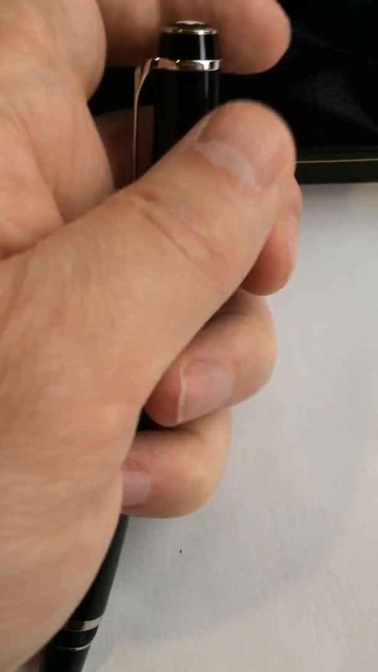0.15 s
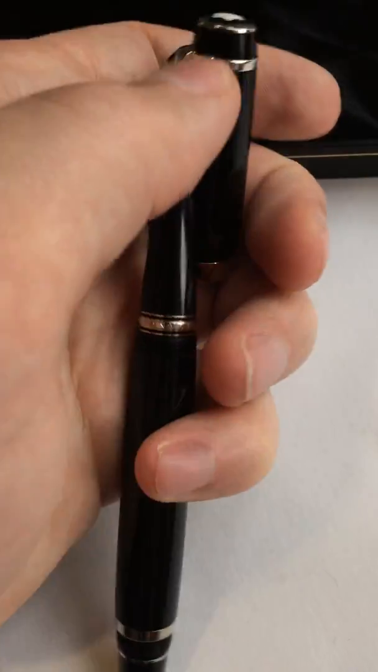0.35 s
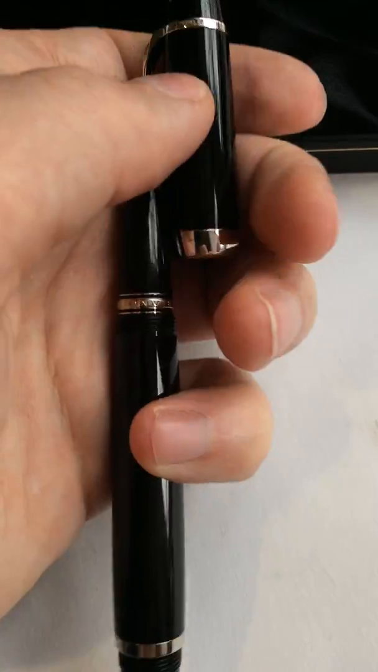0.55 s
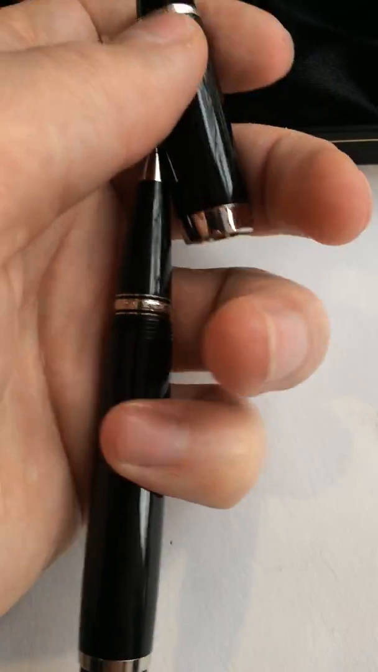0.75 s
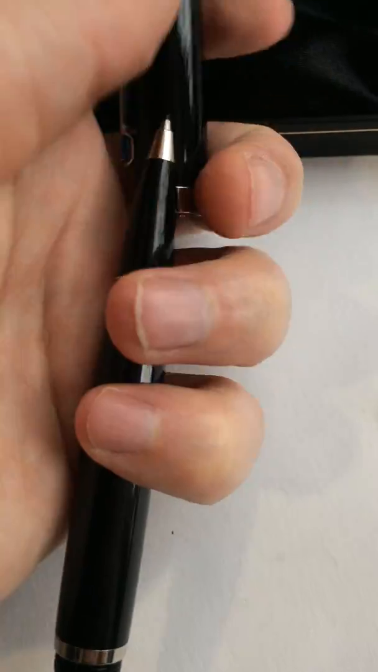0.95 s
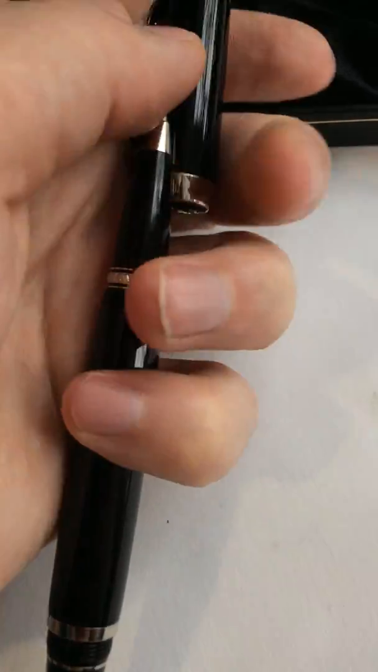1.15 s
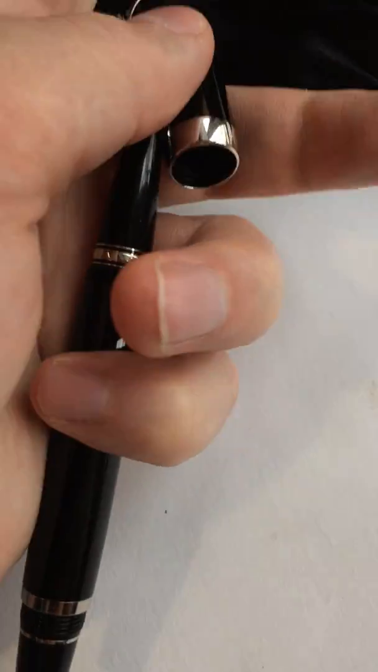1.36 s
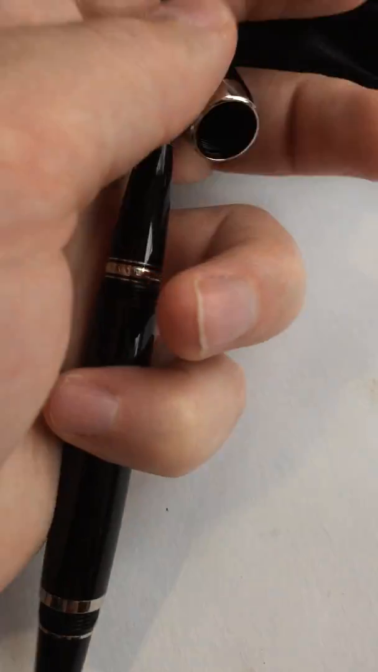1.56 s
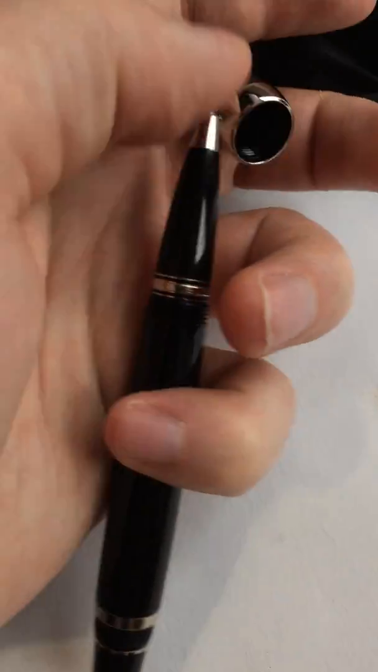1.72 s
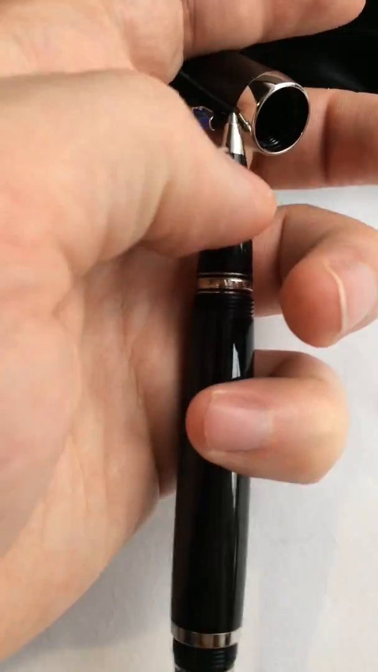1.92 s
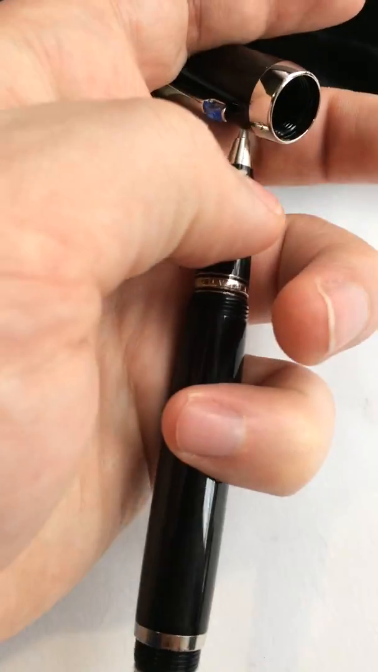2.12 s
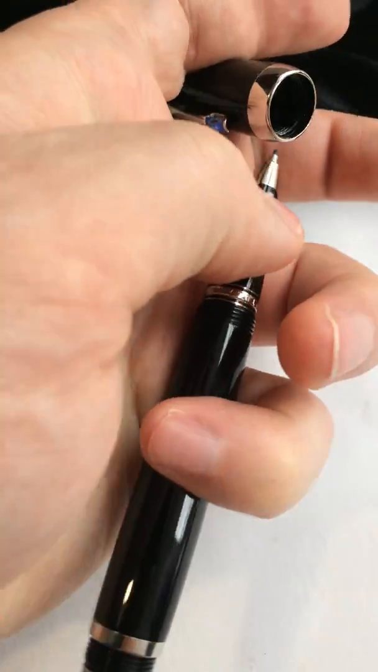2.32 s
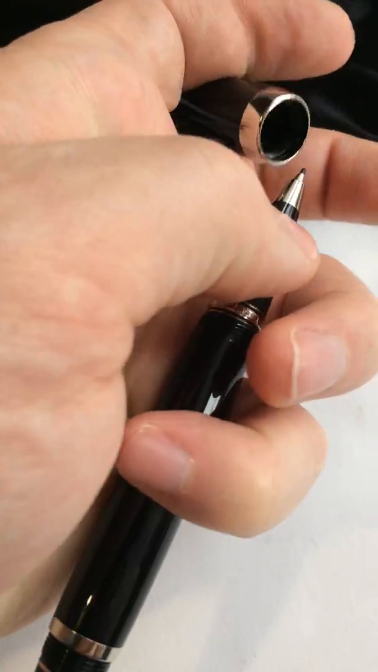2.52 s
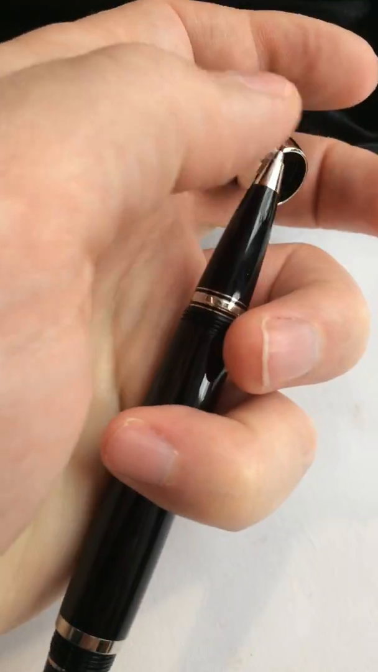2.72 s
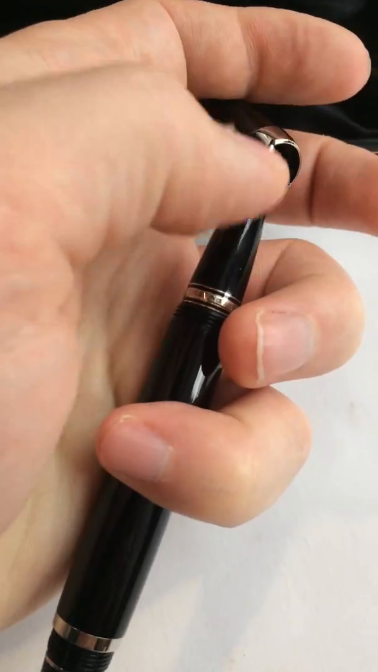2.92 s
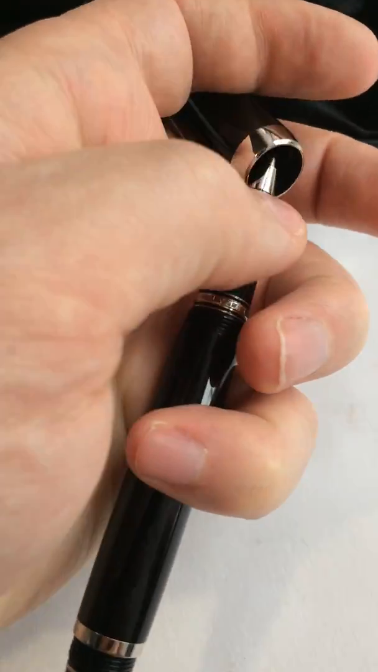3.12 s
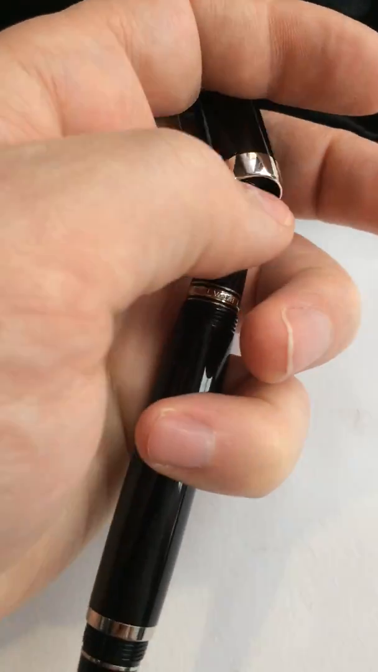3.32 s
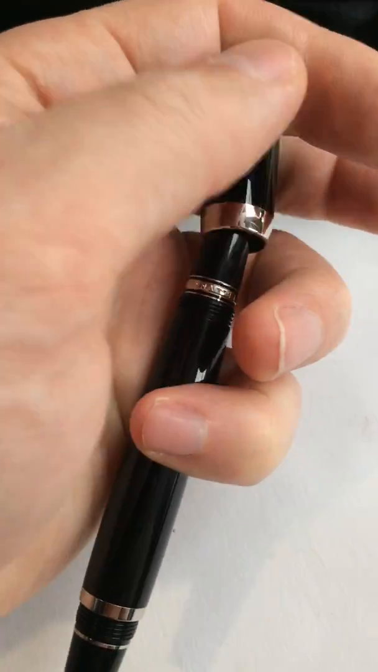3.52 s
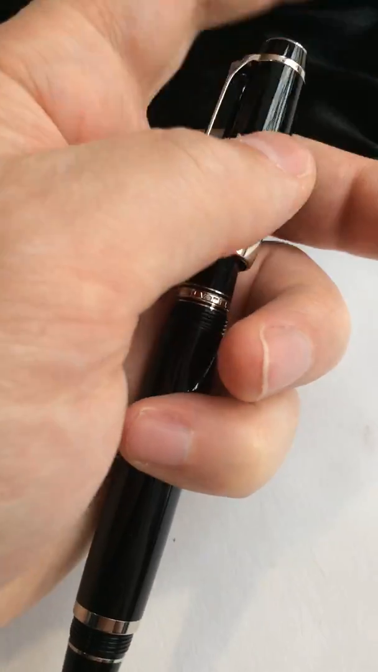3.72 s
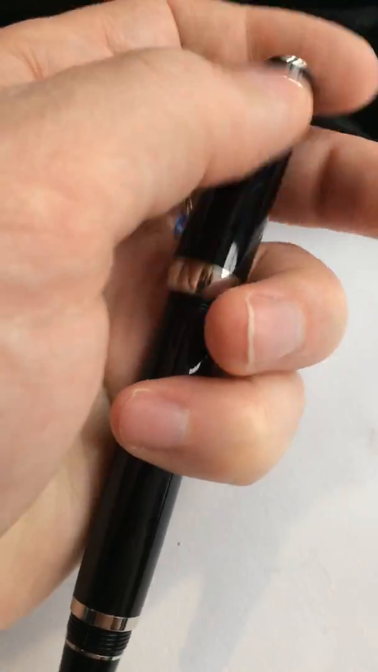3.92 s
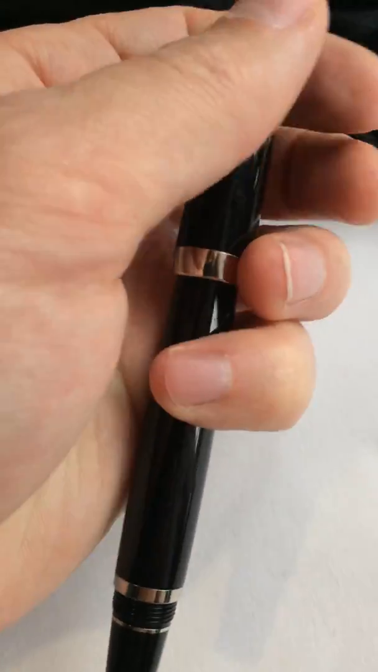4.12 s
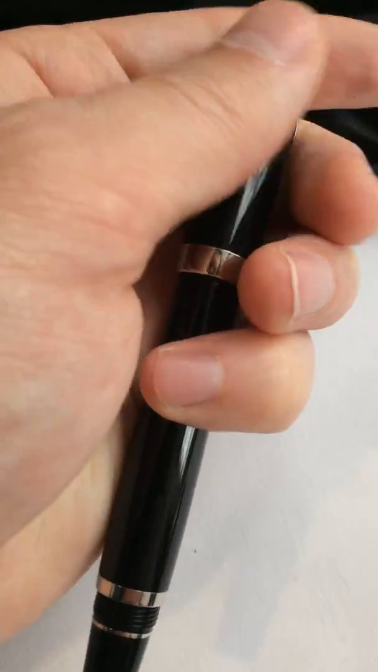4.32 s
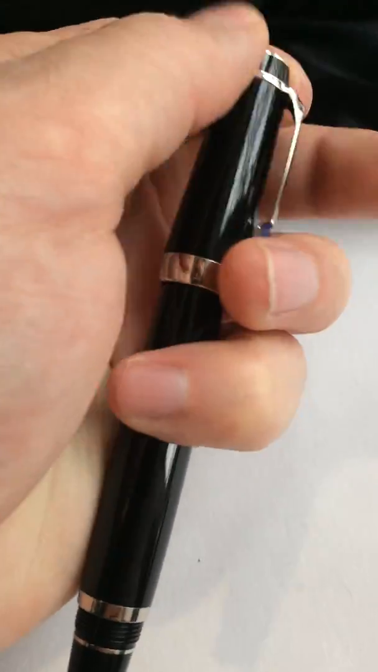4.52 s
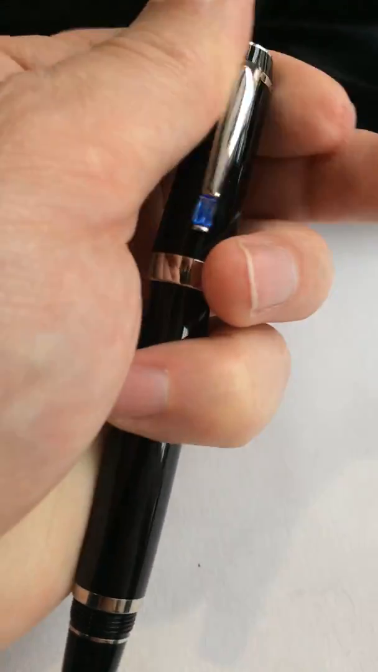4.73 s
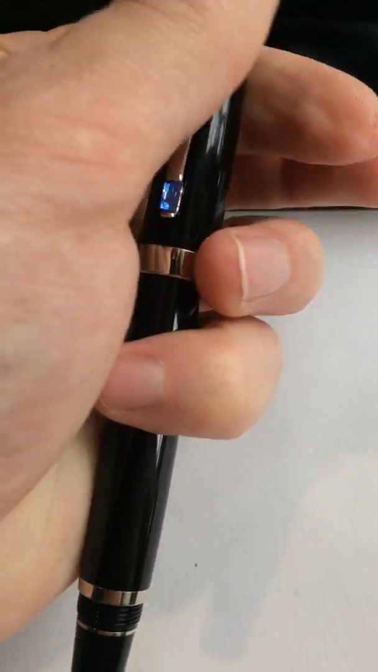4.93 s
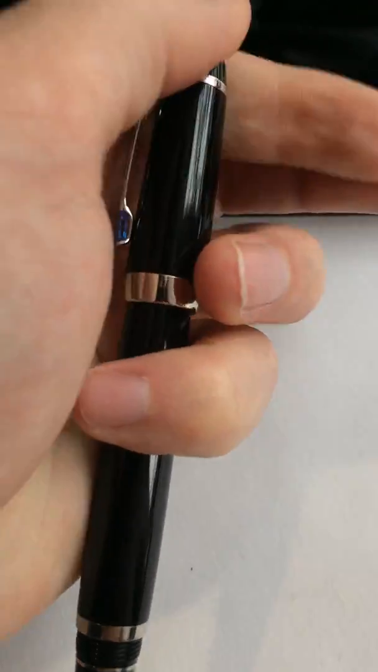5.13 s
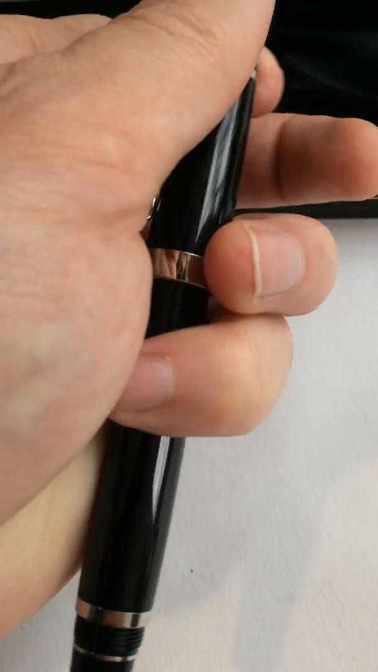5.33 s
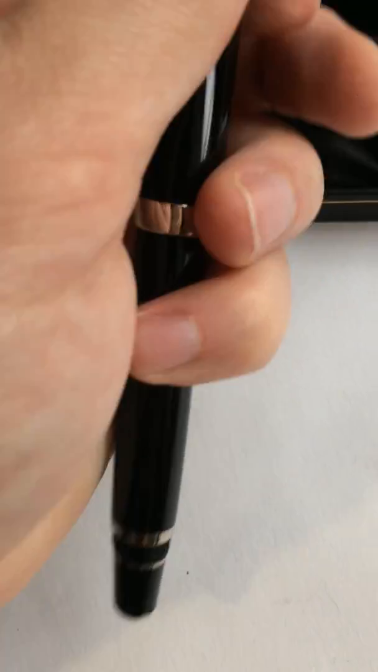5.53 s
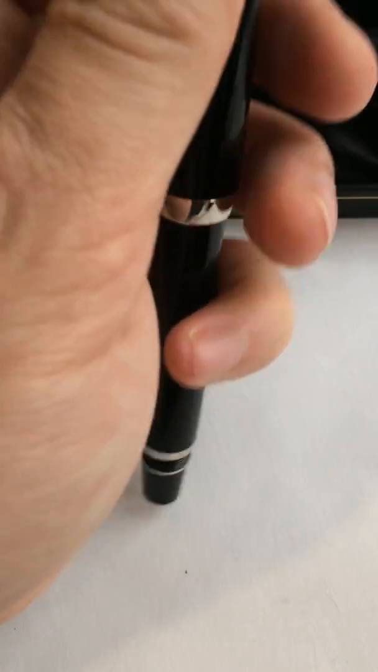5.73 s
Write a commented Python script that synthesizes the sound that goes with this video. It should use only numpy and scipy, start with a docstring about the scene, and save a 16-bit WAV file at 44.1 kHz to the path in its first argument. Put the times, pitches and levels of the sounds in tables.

```python
"""Capping a pen

Hands lift the cap off a resin and metal pen, tap it against barrel and tip, slide it on and twist it tight.
Each contact is an impulse and a dying chatter of micro-impacts that excite the resonances of the parts.
A hard contact is brighter, a light one chatters longer; the cap seats in a rattling burst of slips.
The clip snaps once, fingers brush the barrel as grainy friction noise, and a short diffuse room answers.
An appliance hums low as wavering tones, over a steady rumble and faint hiss of room air."""
import sys
import numpy as np
from scipy import signal
from scipy.fft import rfft, irfft
from scipy.io import wavfile
from scipy.ndimage import uniform_filter1d

SR = 44100
rng = np.random.default_rng(int(sys.argv[2]) if len(sys.argv) > 2 else 0)


def file_out(sig):
    """Save sig as 16-bit WAV at sys.argv[1]."""
    # one column per channel
    cols = np.atleast_2d(sig).T
    # limit, then scale
    lim = np.clip(cols, -1, 1)
    pcm = np.round(lim * 32767).astype(np.int16)
    wavfile.write(sys.argv[1], SR, pcm)


N = 258426


def from_db(db):
    """Level: decibels to amplitude gain."""
    return 10 ** (np.asarray(db) / 20)


def unit_energy(x):
    """Energy normalisation: the squares sum to one."""
    return x / np.sqrt(np.sum(x ** 2) + 1e-20)


def band(x, low_hz, high_hz, order=2):
    """Band limitation: a causal Butterworth band-pass."""
    edges_hz = [low_hz, min(high_hz, .45 * SR)]
    return signal.sosfilt(signal.butter(order, edges_hz, "band", fs=SR, output="sos"), x)


def add(out, s, sound):
    """Superposition: mix a sound in at a time in seconds."""
    at = int(np.clip(round(s * SR), 0, N - 1))
    out[at:at + len(sound)] += sound[:N - at]


def drift(per_s):
    """Random modulation: normal values of unit spread, joined by straight lines, per_s of them a second."""
    knots = rng.standard_normal(400)
    return np.interp(np.arange(N) / SR * per_s, np.arange(len(knots)), knots)


# appliance hum, one row a tone: pitch_hz, rms_db, waver_db
HUM = [(98, -82, 3), (147.3, -63.3, 1.0), (254, -73, 1.5), (296, -83, 3), (441, -85, 3), (668, -88, 2),
       (801, -89, 2)]


def hum():
    """Tonal motor noise: sinusoids that waver a little in level and phase."""
    t = np.arange(N) / SR
    out = np.zeros(N)
    for hz, db, waver_db in HUM:
        amplitude = np.sqrt(2) * from_db(db + waver_db * drift(5.0))
        phase_waver = 0.2 * waver_db * drift(5.3)
        out += amplitude * np.sin(2 * np.pi * hz * t + phase_waver)
    return out


# spectral shape of the room air: frequency_hz, relative_density_db (per Hz)
AIR = [(25, -24), (45, -9), (95, -6), (135, -5.5), (185, -1), (235, -8), (285, -7.5), (340, -14.5),
       (450, -14), (950, -21.5), (2500, -25.5), (5000, -30.5), (12000, -33.5), (16000, -44)]


def air(rms_db=-66):
    """Stationary broadband noise: steady low rumble fading into faint hiss."""
    hz, db = np.transpose(AIR)
    bins_hz = np.maximum(np.fft.rfftfreq(N, 1 / SR), 1)
    shape = from_db(np.interp(np.log(bins_hz), np.log(hz), db))
    noise = irfft(rfft(rng.standard_normal(N)) * shape, N)
    return from_db(rms_db) * np.sqrt(N) * unit_energy(noise)


def room(direct, all_round, desk_db, desk_t60):
    """Reflection and reverberation: quick scatter from hands and desk, then a diffuse, duller tail."""
    tail_t60_s, tail_db, dull_hz = 0.17, -20, 6700
    t = np.arange(SR // 2) / SR
    near, far = rng.standard_normal((2, len(t))) * (t > .002)  # nothing returns within 2 ms
    scatter = from_db(desk_db) * unit_energy(near * from_db(-60 * t / desk_t60))
    tail = from_db(tail_db) * unit_energy(far * from_db(-60 * t / tail_t60_s))
    echoes = signal.fftconvolve(direct, scatter) + signal.fftconvolve(all_round, tail)
    return band(echoes[:N], 200, dull_hz, order=1)


# spans in which the fingers shift their hold: from_s, to_s
REGRIPS = [(4.299, 6), (5.003, 5.7)]


def brushes(count):
    """Random light friction: faint strokes scattered through each change of hold."""
    length_s, level_db, octaves = 0.033, -72, 0.98
    centre_hz, spread_octaves = 2880, 0.76
    out = []
    for start, end in REGRIPS:
        for k in range(count):
            s = start + (end - start) * (k + rng.random()) / count
            hz = centre_hz * 2 ** (spread_octaves * (2 * rng.random() - 1))
            out.append((s, length_s, level_db, hz, octaves))
    return out


# skin sliding on the pen: middle_s, length_s (at half height), rms_db (before the swell), centre_hz, width_octaves
RUBS = [(0.08, 0.16, -73.5, 2750, 0.59), (0.116, 0.046, -72, 8800, 0.45), (0.425, 0.049, -66.5, 2910, 0.6),
        (0.472, 0.045, -71, 2640, 0.499), (0.51, 0.058, -75, 10600, 0.17), (1.346, 0.042, -75, 7840, 0.34),
        (1.703, 0.07, -63.5, 1820, 0.77), (1.82, 0.056, -76, 12100, 0.43),
        (2.173, 0.037, -70.5, 2480, 0.94), (3.536, 0.054, -76.5, 2725, 0.93), (4.47, 0.058, -66, 4160, 1.6),
        (4.665, 0.045, -75, 8000, 0.2), (4.765, 0.04, -73.5, 11100, 0.084), (4.867, 0.02, -65, 5000, 1.8),
        (4.93, 0.08, -73, 7930, 2.2), (5.266, 0.05, -69, 8600, 0.42), (5.284, 0.044, -67.5, 2740, 0.97),
        (5.727, 0.021, -69, 3060, 0.9)]


def fingers(grain_db, clump_db, clumps_per_s):
    """Stick-slip friction: skin catches in tiny grains, bunched into uneven scratches under a swell."""
    out, t = np.zeros(N), np.arange(SR // 2) / SR
    for s, length, db, hz, octaves in RUBS + brushes(count=5):
        hiss, catch, grip = rng.standard_normal((3, len(t)))
        size = int(np.clip(2 * length * SR, 64, len(t)))
        clumps = np.interp(t * clumps_per_s, np.arange(len(grip)), grip)
        grains = hiss * from_db(grain_db * catch + clump_db * np.minimum(clumps, 1.5))
        friction = band(grains, hz * 2 ** (-octaves / 2), hz * 2 ** (octaves / 2), order=1)[:size]
        add(out, s - length, from_db(db) * np.sqrt(size) * unit_energy(friction) * np.hanning(size))
    return out


def resonate(x, hz, width_hz):
    """Damped resonance: a two-pole filter with gain near one at its top."""
    r = np.exp(-np.pi * width_hz / SR)
    zeros = np.array([1, 0, -1]) * (1 - r * r) / 2
    return signal.lfilter(zeros, [1, -2 * r * np.cos(2 * np.pi * hz / SR), r * r], x)


def recolour(sound, energies_db, edges):
    """Minimum-phase equalisation: steer the energy of each band of a short sound to its level, causally."""
    size = len(sound)
    spectrum, hz = rfft(sound), np.fft.rfftfreq(size, 1 / SR)
    which = np.searchsorted(edges[1:-1], hz)
    energy = np.bincount(which, np.abs(spectrum) ** 2) * 2 / size
    log_gain = np.log(from_db(energies_db) / np.sqrt(energy + 1e-20))[which]
    cepstrum = irfft(uniform_filter1d(log_gain, size=25), size)  # band steps smoothed
    folded = cepstrum * (1 + np.sign(np.fft.fftfreq(size)))
    return irfft(spectrum * np.exp(rfft(folded)), size)


# limits of the low, main, bright and top bands: edge_hz
BAND_EDGES = [1110, 2350, 6000, 9200, 13800]


def contacts(rows, body, chatter_db, crack_db, vary_db, detune=0.0053, edges=BAND_EDGES):
    """Modal excitation: snap and chatter ring the body, towards the microphone and all round into the room."""
    # heard from all sides at once, the resonances blur into one broad hump, fuller in the low band
    hump_hz, hump_width_hz, hump_low_db = 3235, 2600, 4.5
    out, t = np.zeros((2, N)), np.arange(SR // 20) / SR
    for s, level_db, low_db, bright_db, top_db, t60 in rows:
        grit = rng.standard_normal(len(t))
        force = grit * np.abs(grit) * from_db(chatter_db - 60 * t / max(t60, 1 / SR))
        force[0] = 1  # the snap
        sound = from_db(crack_db) * unit_energy(force)
        for (hz, width_hz, db), (strength, shift) in zip(body, rng.standard_normal((len(body), 2))):
            # the grip changes, so every mode shifts a little from touch to touch
            ring = unit_energy(resonate(force, hz * (1 + detune * shift), width_hz))
            sound = sound + from_db(db + vary_db * strength) * ring
        blurred = resonate(force, hump_hz, hump_width_hz)
        for path, wave, extra_low_db in zip(out, (sound, blurred), (0, hump_low_db)):
            # small parts radiate almost no bass
            wave = band(wave, edges[0], edges[-1], order=4)
            energies_db = level_db + np.array([low_db + extra_low_db, 0, bright_db, top_db])
            add(path, s, recolour(wave, energies_db, edges))
    return out


def touches(rows, low_db, bright_db, top_db, t60):
    """Contact stiffness: a harder touch is brighter and thinner, a lighter one skids for longer."""
    thinning = 0.4  # dB of low band lost per dB of hardness
    doubling_db = 15.5  # a touch this much lighter chatters twice as long
    out = []
    for s, db, hard_db in rows:
        chatter_s = t60 * 2 ** (-db / doubling_db)
        out.append((s, db, low_db - thinning * hard_db, bright_db + hard_db, top_db + hard_db, chatter_s))
    return out


def bouncing(rows, gap_s, loss_db, count):
    """Rebound: the n-th gap is 1/n of the first, and the level drops with each doubling of n."""
    out = []
    for s, db, hard_db in rows:
        for n in range(1, 2 + count):
            out.append((s, db - loss_db * np.log2(n), hard_db))
            s = s + gap_s / n
    return out


def hand_thud(rows, thud_db, t60):
    """Damped structural shock: a click jolts the barrel in the hand, a dull knock under it."""
    out, t = np.zeros(N), np.arange(SR // 10) / SR
    for s, level_db, *colour in rows:
        knock = band(rng.standard_normal(len(t)) * from_db(-60 * t / t60), 390, 1050)
        add(out, s, from_db(level_db + thud_db) * unit_energy(knock))
    return out


# ringing of the metal clip: pitch_hz, relative_level_db, t60_s
CLIP_MODES = [(3520, -39, .055), (3860, -44, .04), (4030, -53, .15), (7897, -61, .1), (9620, -62, .1),
              (10660, -57, .1)]


def clip_ring(rows, ring_db):
    """Lightly damped modes: the springy clip picks up each contact and rings faintly."""
    out, t = np.zeros(N), np.arange(SR // 4) / SR
    ring = sum(from_db(db - 60 * t / t60) * np.sin(2 * np.pi * hz * t) for hz, db, t60 in CLIP_MODES)
    for s, level_db, *colour in rows:
        add(out, s, from_db(level_db + ring_db) * ring)
    return out


# ticks as the thumb lifts the cap off: start_s, level_db, hardness_db
UNCAP_TICKS = [(0.0, -16, 1), (0.0595, -45, -2), (0.0905, -52, -6), (0.1515, -53, 15), (0.1853, -25.5, 1),
               (0.2194, -32, -3)]
# resonances of the half-lifted cap: pitch_hz, width_hz, energy_db
LIFTED_CAP = [(2040, 340, 8), (3030, 330, -0.5), (3880, 220, 4), (6300, 580, -1), (7750, 390, 8),
              (8900, 320, 2), (10400, 540, -18), (14300, 600, -8)]


def uncapping():
    """Release ticks: the lifted cap's modes are struck as it comes free."""
    ticks = touches(UNCAP_TICKS, low_db=-15, bright_db=-10.5, top_db=-15, t60=0.0035)
    return contacts(ticks, LIFTED_CAP, chatter_db=-23, crack_db=-15, vary_db=2)


CLIP_SNAP = [(5.1573, -5, -0.5)]
# resonances of the cap pinched between the fingers: pitch_hz, width_hz, energy_db
PINCHED_CAP = [(1240, 260, -14), (1750, 100, -7), (2380, 250, -4), (2790, 300, -3.5), (3740, 360, -3.5),
               (4500, 380, -21), (5300, 290, -7), (7160, 510, 3.5), (7870, 250, -9), (9650, 270, 3.5),
               (11600, 280, -4), (12800, 670, -13)]


def clip_snap():
    release = touches(CLIP_SNAP, low_db=-17.5, bright_db=-4.5, top_db=-12.0, t60=0.0023)
    snap = contacts(release, PINCHED_CAP, chatter_db=-20.0, crack_db=-23, vary_db=-1.0)
    return snap + hand_thud(release, thud_db=-27.5, t60=0.0073)


# the cap's edge glances off the pointed tip: start_s, level_db, hardness_db
TIP_TAPS = [(0.4346, -47, 8), (0.6355, -56, 19), (0.6922, -21.5, 11), (0.7858, -37, 9.5),
            (1.4718, -38, -1.5)]
# resonances of the metal tip: pitch_hz, width_hz, energy_db
METAL_TIP = [(1980, 200, 0), (3270, 170, -13), (3750, 230, -9), (5140, 550, -10.5), (5900, 420, -13),
             (6800, 310, -11), (7930, 350, 2), (8900, 500, 2.5), (10800, 280, -4), (12500, 600, -12),
             (14100, 600, -2), (14700, 550, -8)]


def tip_taps():
    """Glancing impact: the cap's edge rings the metal tip."""
    pings = touches(TIP_TAPS, low_db=-3.0, bright_db=-5.5, top_db=-11, t60=0.0048)
    return contacts(pings, METAL_TIP, chatter_db=-23, crack_db=-15, vary_db=2)


# the tip touches the metal mouth of the cap: start_s, level_db, hardness_db
RIM_TAPS = [(2.0226, -26.5, 4.5), (2.0269, -30, 4.5), (2.0313, -40, 3), (3.1886, -26, 5.5)]
# resonances of the cap's hollow mouth: pitch_hz, width_hz, energy_db
CAP_MOUTH = [(1780, 130, -1.5), (1950, 110, -2), (3490, 530, -9), (3950, 190, -3), (7830, 350, 1),
             (7960, 400, 5), (9500, 400, -9), (11200, 400, 5), (11900, 610, -3), (14000, 880, -5)]


def rim_taps():
    """Rim excitation: the tip grazes the cap and rings its hollow mouth."""
    grazes = touches(RIM_TAPS, low_db=0.5, bright_db=-4.0, top_db=-6.0, t60=0.0044)
    return contacts(grazes, CAP_MOUTH, chatter_db=-23, crack_db=-24, vary_db=2)


# the cap scrapes over the grip on its way down: start_s, length_s, level_db (typical skid), hardness_db
SLIDES = [(3.72, 0.021, -37, 1.5), (4.002, 0.017, -38, -4)]


def skids(spread_db, count):
    """Sliding contact: a slide is a string of light, uneven touches."""
    out = []
    for start, length, db, hard_db in SLIDES:
        for k in range(count):
            s = start + length * (k + rng.random() / 2) / count
            out.append((s, db + spread_db * rng.standard_normal(), hard_db))
    return out


# the cap's inner wall nudges the grip: start_s, level_db, hardness_db
NUDGES = [(1.1114, -46.5, 5), (3.2691, -32.5, -9), (3.5305, -39.5, 0.5), (3.632, -40.5, -2),
          (3.6527, -43.5, -3), (3.9914, -27.5, -2.5)]
# resonances of the cap's resin wall: pitch_hz, width_hz, energy_db
CAP_WALL = [(1370, 300, -8), (2016, 190, 1), (2650, 350, 2.5), (3480, 450, -2), (4100, 260, -5.5),
            (7360, 900, -3.5), (11100, 1200, -6.5)]
# resin on resin is a softer contact, whose main band ends lower: edge_hz
RESIN_EDGES = [1000, 2350, 4600, 9200, 13800]


def wall_scrapes():
    """Soft contact: nudges and skids of resin on resin ring the cap's wall."""
    rows = NUDGES + skids(spread_db=2.0, count=10)
    scrapes = touches(rows, low_db=-0.5, bright_db=-7.5, top_db=-11, t60=0.003)
    return contacts(scrapes, CAP_WALL, chatter_db=-19, crack_db=-22, vary_db=2, detune=0.012,
                    edges=RESIN_EDGES)


# the loose cap knocks against the barrel: start_s, level_db, hardness_db
CAP_TAPS = [(0.5502, -3, 0.5)]
# resonances of the loose cap: pitch_hz, width_hz, energy_db
OPEN_CAP = [(1806, 130, 10), (2300, 80, -13), (3700, 220, 5), (3935, 220, 3.5), (4560, 510, -14),
            (5660, 380, -2.5), (6640, 350, -12), (7700, 350, -2), (9470, 350, 1.5), (10300, 400, 4),
            (11400, 390, -19), (14600, 1100, -11.5)]


def cap_taps():
    """Impact with rebound: the loose cap bounces on the barrel and its clip rings on."""
    bounces = bouncing(CAP_TAPS, gap_s=.0082, loss_db=7.5, count=5)
    taps = touches(bounces, low_db=-17.5, bright_db=-7.5, top_db=-4.0, t60=0.0023)
    knocks = contacts(taps, OPEN_CAP, chatter_db=-20, crack_db=-18.0, vary_db=4.5)
    return knocks + clip_ring(taps, ring_db=-3)


# the cap's mouth knocks on the grip as it slides down: start_s, level_db, hardness_db
GRIP_KNOCKS = [(3.7445, -10, -1)]
# resonances of the cap as it meets the grip: pitch_hz, width_hz, energy_db
CAP_ON_GRIP = [(1760, 160, 5.5), (2090, 330, 5), (2630, 260, 1), (4010, 240, 4.5), (4650, 500, -12),
               (5600, 560, -7), (7280, 470, 2), (10700, 550, 0), (11400, 500, 2), (15000, 800, -13)]


def grip_knocks():
    """Double impact: the cap's mouth lands on the grip and bounces once."""
    bounces = bouncing(GRIP_KNOCKS, gap_s=.0023, loss_db=2.0, count=1)
    landing = touches(bounces, low_db=-4.5, bright_db=-4.0, top_db=-4.0, t60=0.0034)
    return contacts(landing, CAP_ON_GRIP, chatter_db=-14.0, crack_db=0.0, vary_db=-0.5)


# ticks of the closed cap, the knock's pitch depending on where it catches:
# start_s, level_db, low_band_db, bright_band_db, top_band_db, knock_hz, thud_db
TWIST_TICKS = [(4.287, -22.5, -8, -15, -14.5, 3600, -22), (4.344, -27.5, -4, -16, -18, 2800, -9.5),
               (4.4021, -18.5, -8, -9.5, -13.5, 3400, -17.5), (4.4356, -41, 2, -12, -16, 2400, -15),
               (4.4504, -21, 2, -12, -16, 2340, -26), (4.4527, -23.5, -5, -19, -14, 4080, -17),
               (4.4852, -18.5, -6, -11, -31, 2780, -19.5), (4.497, -40, -6, -8, -9, 2900, -20),
               (4.7516, -37.5, -3.5, -16, -15, 3050, -10), (4.8141, -24, -2.5, -15.5, -20, 2720, -16),
               (5.5065, -33, -3.5, -19, -17, 3800, -20)]
# resonances of the closed pen: pitch_hz, width_hz, energy_db
CLOSED_PEN = [(1066, 550, -14), (1550, 740, -3), (2150, 470, -1.5), (2785, 170, 6.5), (3643, 450, 1.5),
              (4100, 410, -21), (5530, 1000, -7), (6400, 1100, 2), (7700, 360, -4), (11600, 1300, 5),
              (14000, 1200, -15)]


def twisting():
    """Stick-slip: each tick of the tight cap rings the closed pen and its own knock, over a short thud."""
    tick_t60_s, knock_width_hz, knock_db = 0.005, 380, 7
    out = 0
    for s, level_db, low_db, bright_db, top_db, knock_hz, thud_db in TWIST_TICKS:
        tick = [(s, level_db, low_db, bright_db, top_db, tick_t60_s)]
        body = CLOSED_PEN + [(knock_hz, knock_width_hz, knock_db)]
        out = out + contacts(tick, body, chatter_db=-18, crack_db=-15, vary_db=1.5)
        out = out + hand_thud(tick, thud_db, t60=0.00062)
    return out


# slips of the cap over its catch, crisp at first and then grinding:
# start_s, level_db, low_band_db, bright_band_db, top_band_db, chatter_t60_s
SLIPS = [(4.0288, -8, -3, -5.5, -2, 0.0042), (4.0338, -9, -15, -11, -2.5, 0.0054),
         (4.0368, -18, -11.5, -10.5, -15, 0.012), (4.0403, -10.5, -3.5, -16, -7.5, 0.0058),
         (4.0446, -18, -2.5, -7, -0.5, 0.01), (4.0466, -5, -2.5, -5.5, 0, 0.0045),
         (4.0536, -9.5, -7.5, -10.5, -5, 0.0098), (4.0614, -10, -3, -3, -4, 0.016),
         (4.0659, -8.5, -12, -5.5, -1, 0.0085), (4.0704, -4.5, -16, -15, -8, 0.029),
         (4.0808, -25, 1, 1, -6.5, 0.013)]
# resonances of the cap pressed onto its catch: pitch_hz, width_hz, energy_db
SEATED_CAP = [(1230, 179, -6.5), (1740, 240, 0.5), (2068, 380, 1), (2518, 260, -1), (3660, 420, 6.5),
              (4700, 430, -1), (5450, 600, -4), (6720, 600, -9), (8000, 540, -4), (9600, 460, -2.5),
              (10540, 480, 3), (12400, 820, -7), (14780, 1000, -7.5)]


def seating():
    slips = contacts(SLIPS, SEATED_CAP, chatter_db=-18, crack_db=-3, vary_db=3, detune=0.018)
    return slips + clip_ring(SLIPS, ring_db=-16) + hand_thud(SLIPS, thud_db=-24, t60=0.0048)


def scene():
    """Superposition of pen, fingers and the room around them."""
    skin = fingers(grain_db=7.5, clump_db=4.5, clumps_per_s=380)
    light = uncapping() + clip_snap() + tip_taps() + rim_taps() + wall_scrapes()
    strong = cap_taps() + grip_knocks() + twisting() + seating()
    direct, all_round = skin + light + strong
    echoes = room(direct, all_round, desk_db=-12.5, desk_t60=0.022)
    return (direct + echoes + hum() + air())[None]


def record(dry):
    """Low-pass filtering: the top is cut steeply above 16.4 kHz."""
    return signal.sosfilt(signal.ellip(10, .1, 80, 16400, fs=SR, output="sos"), dry)


dry = scene()
out = record(dry)
file_out(out)
```